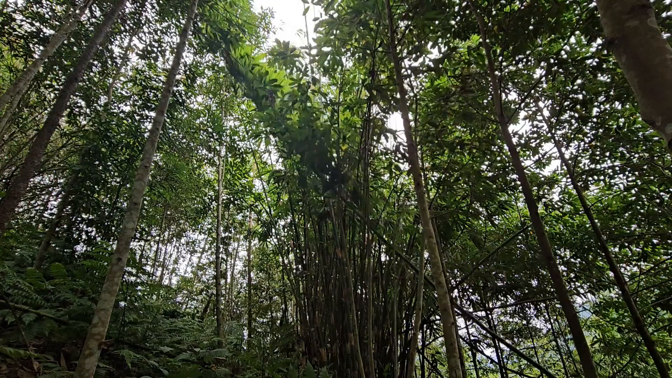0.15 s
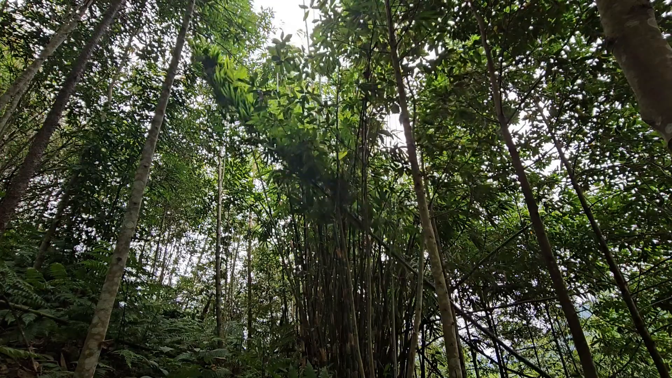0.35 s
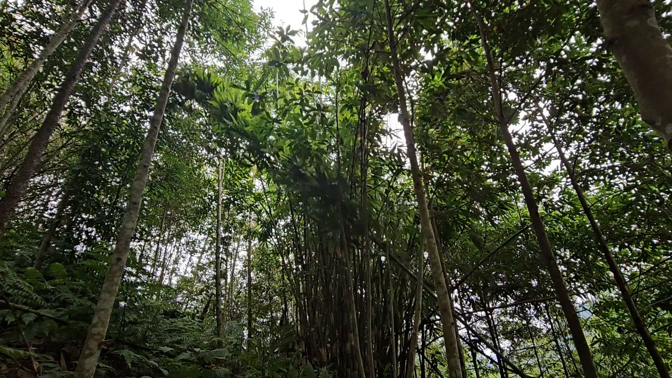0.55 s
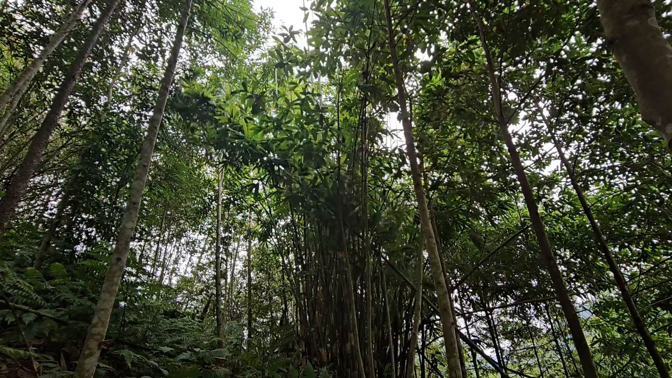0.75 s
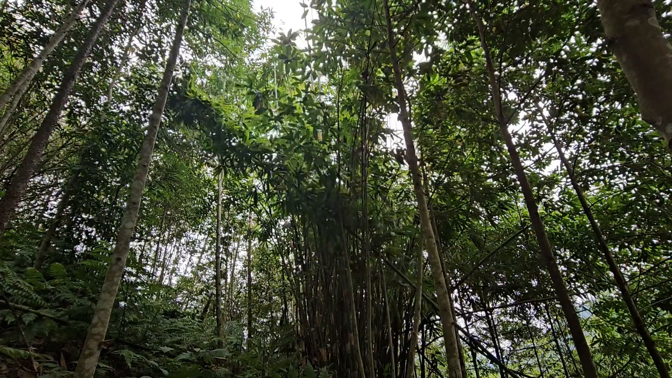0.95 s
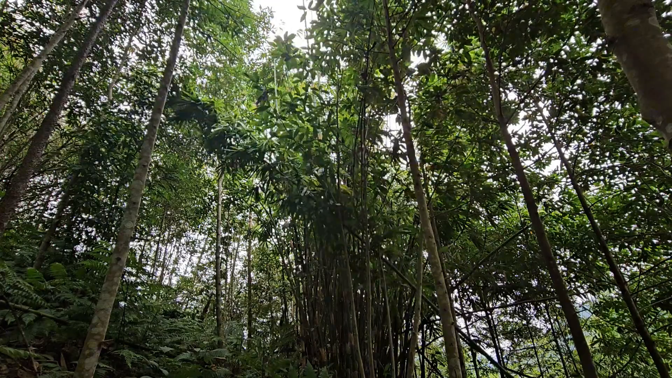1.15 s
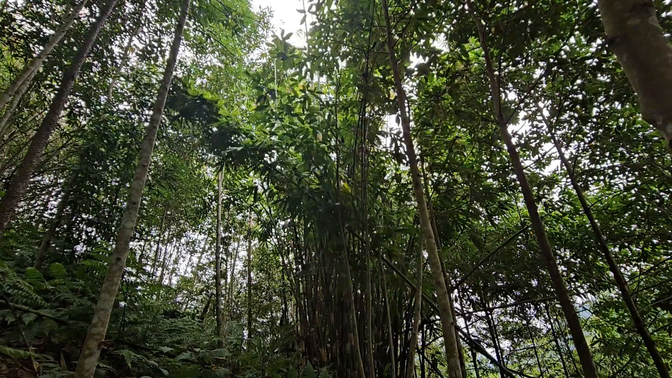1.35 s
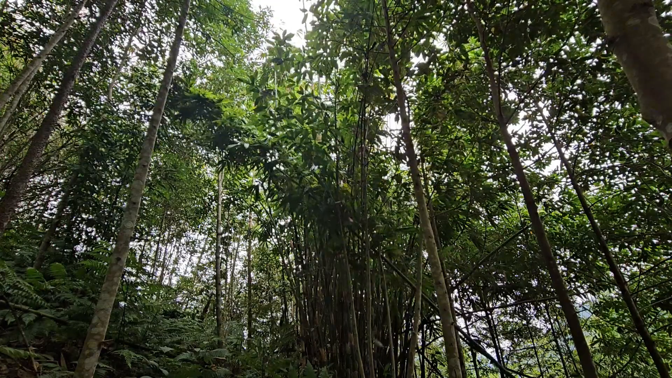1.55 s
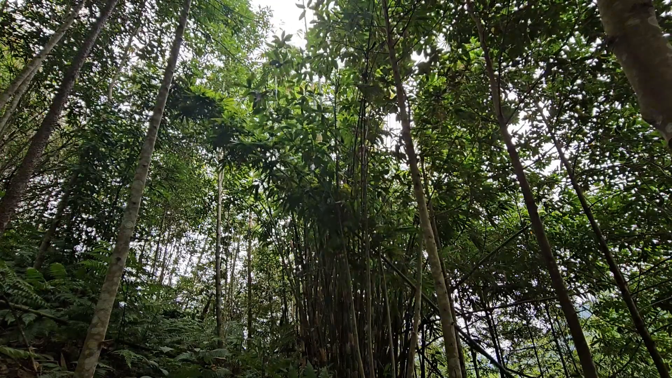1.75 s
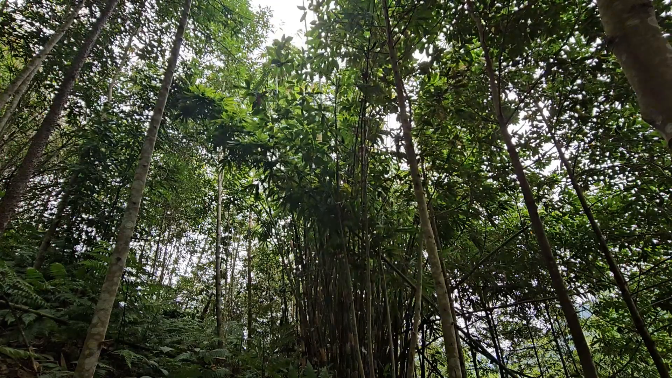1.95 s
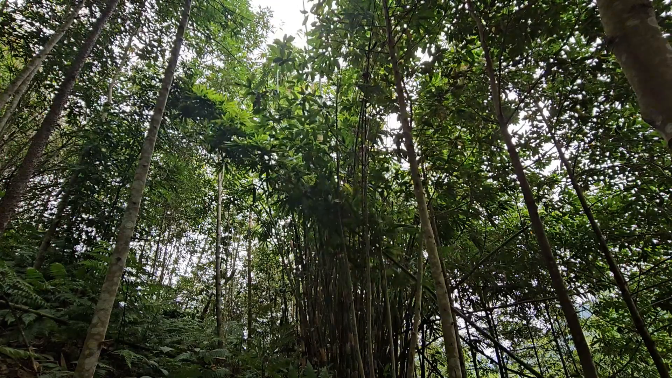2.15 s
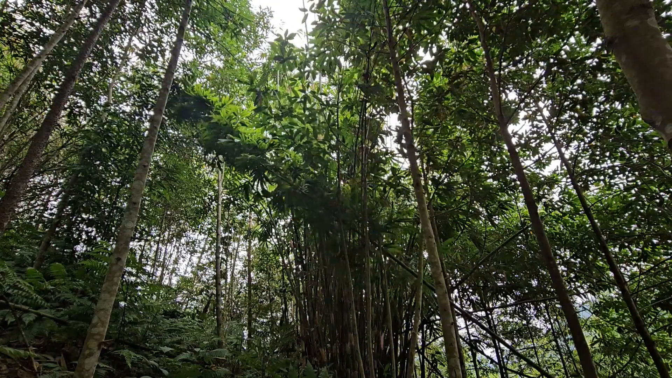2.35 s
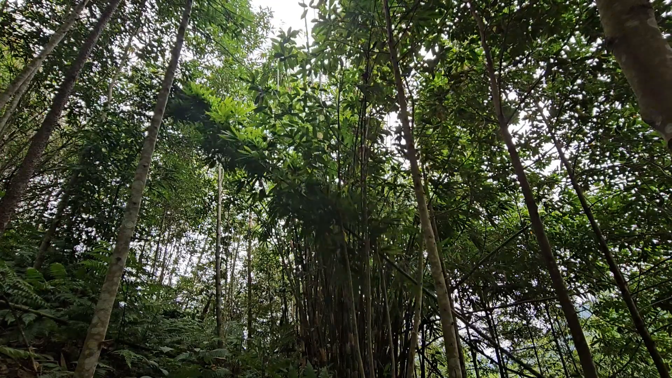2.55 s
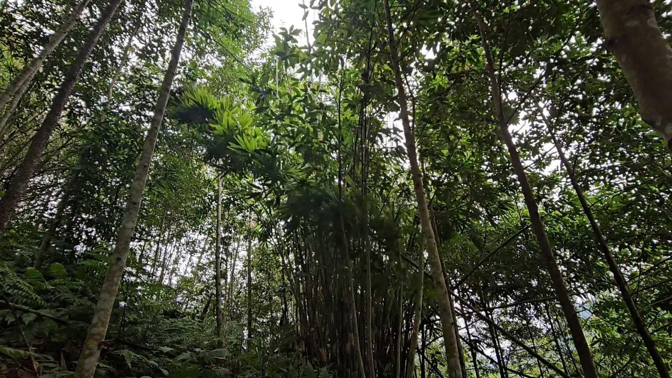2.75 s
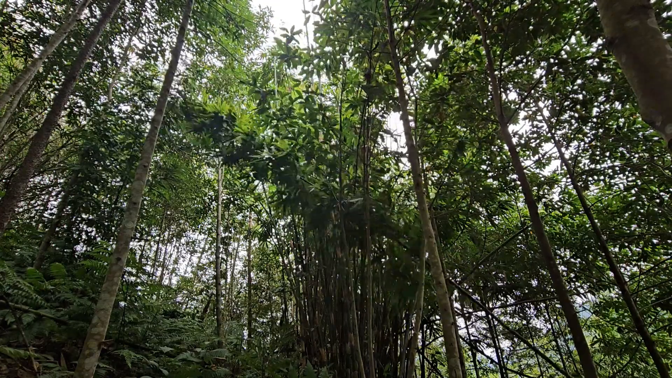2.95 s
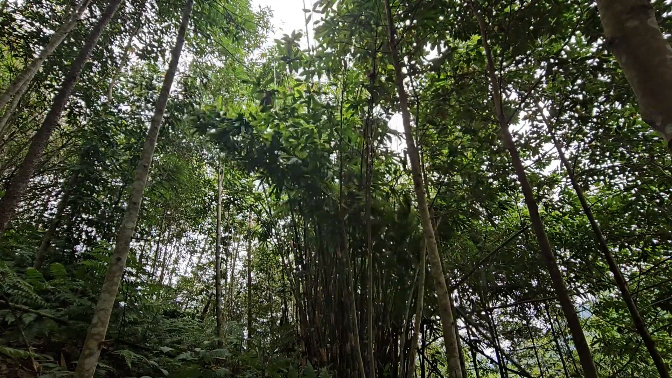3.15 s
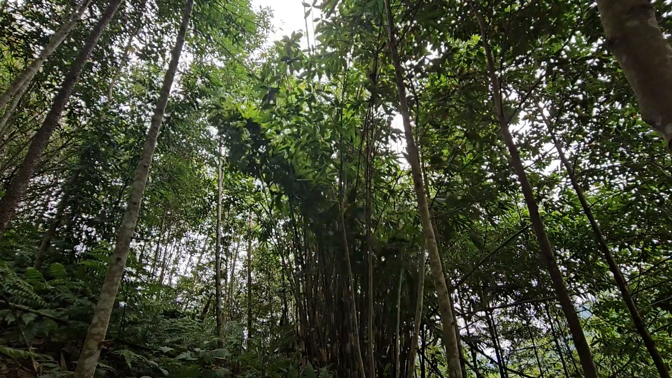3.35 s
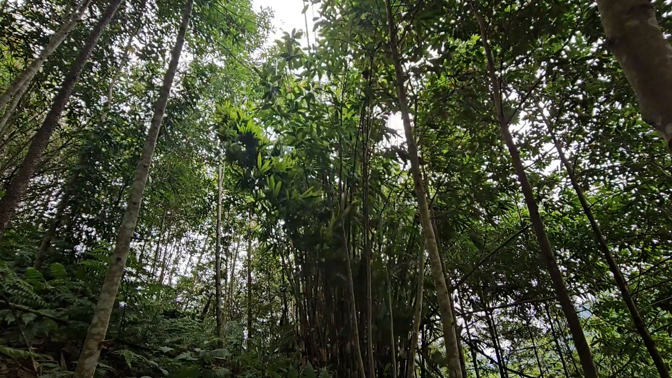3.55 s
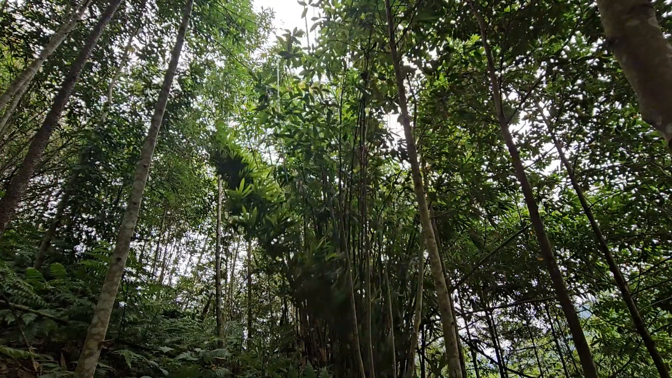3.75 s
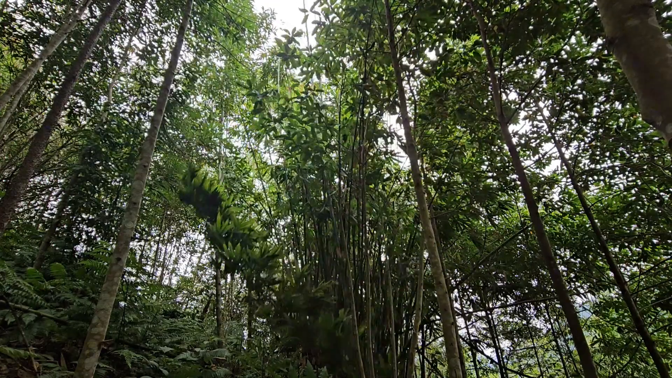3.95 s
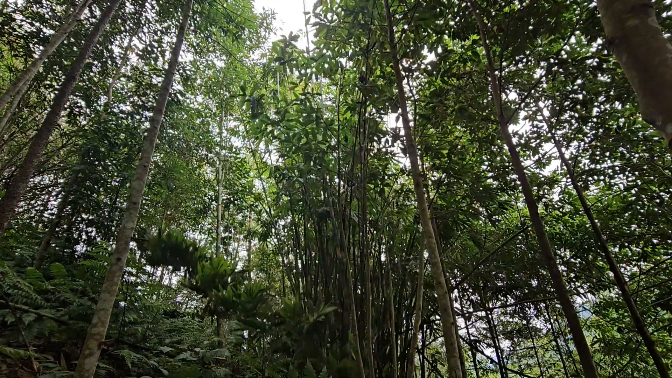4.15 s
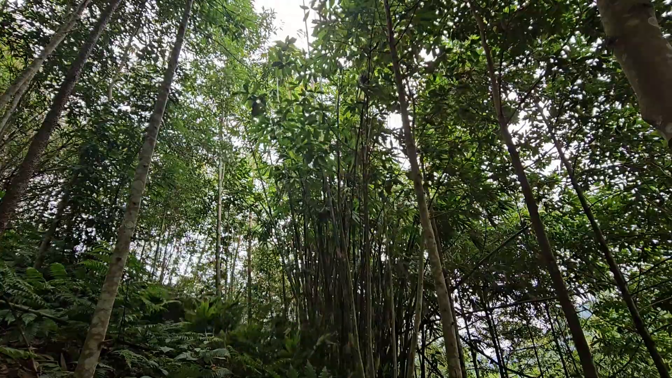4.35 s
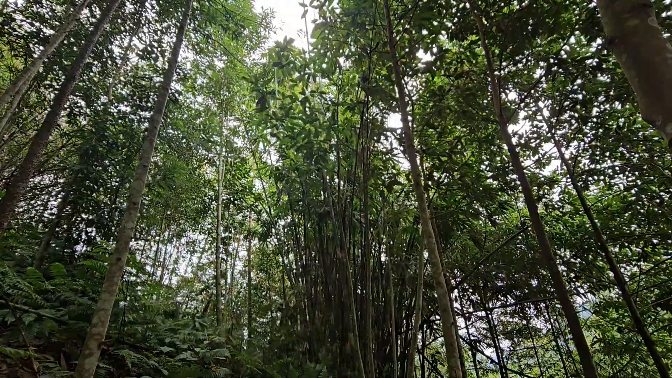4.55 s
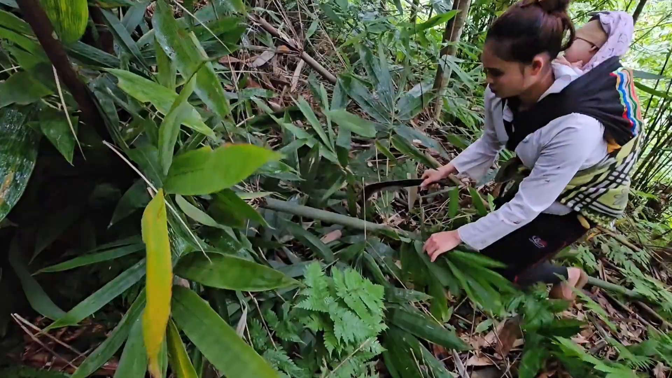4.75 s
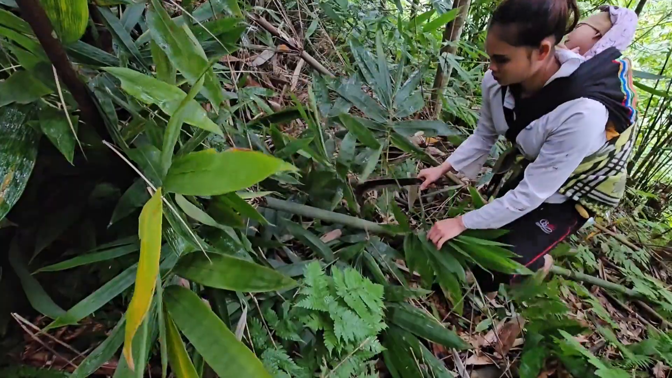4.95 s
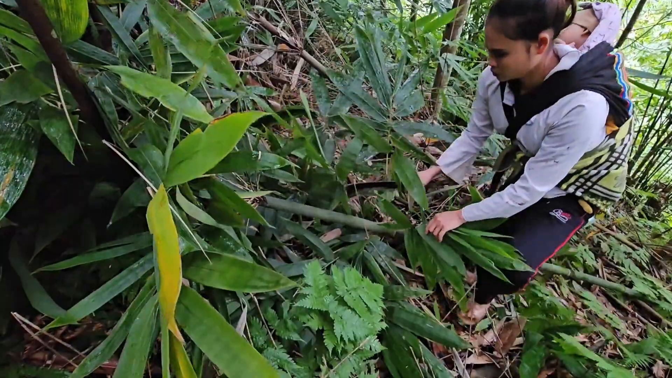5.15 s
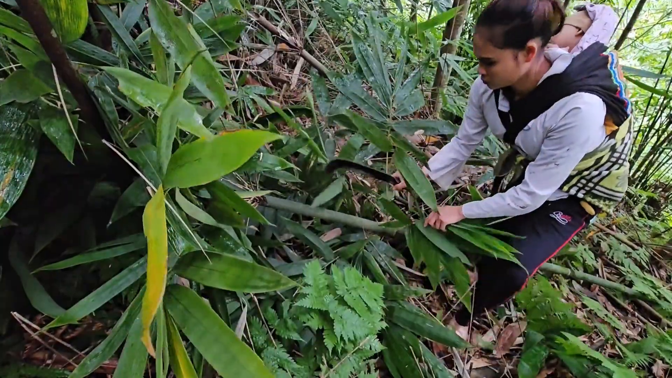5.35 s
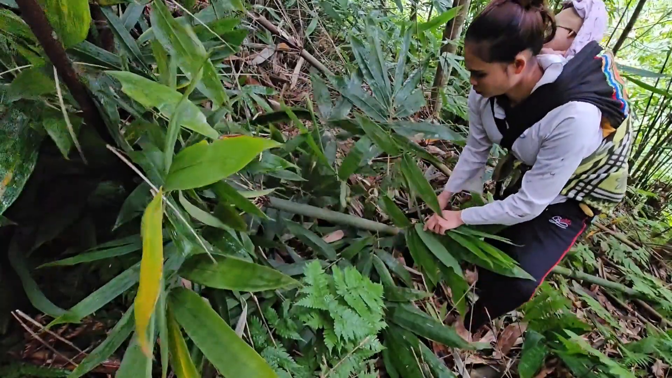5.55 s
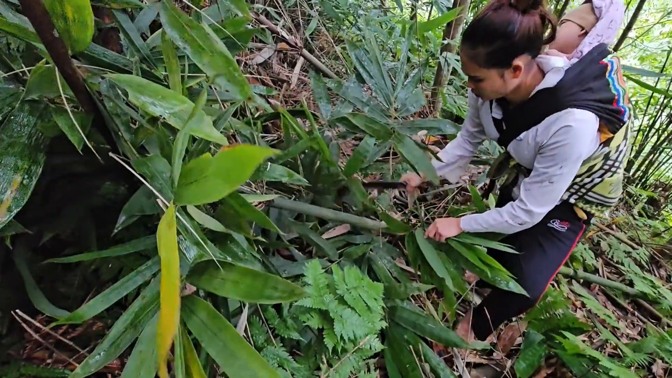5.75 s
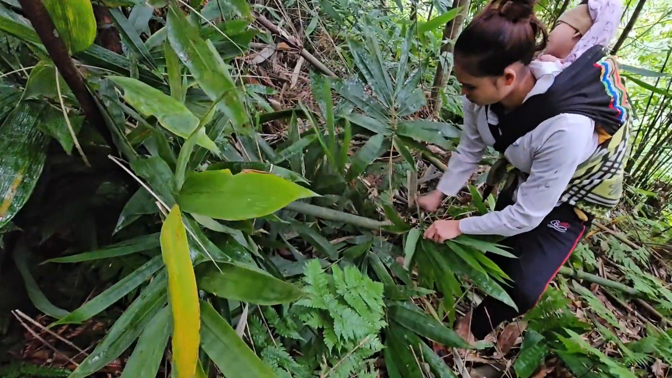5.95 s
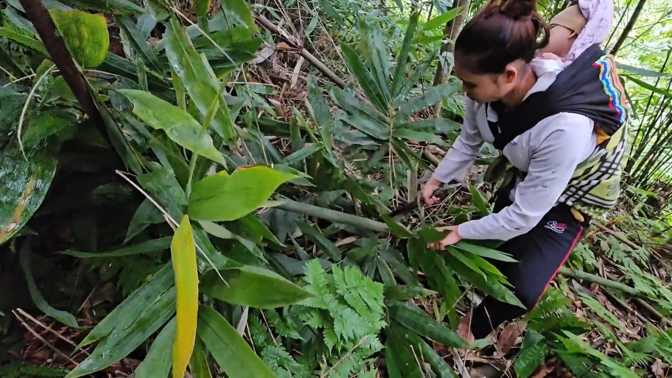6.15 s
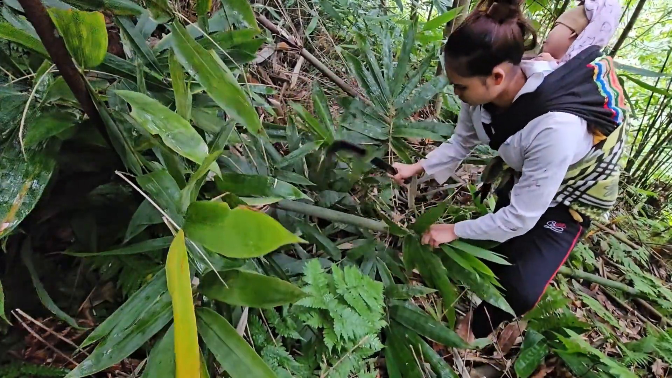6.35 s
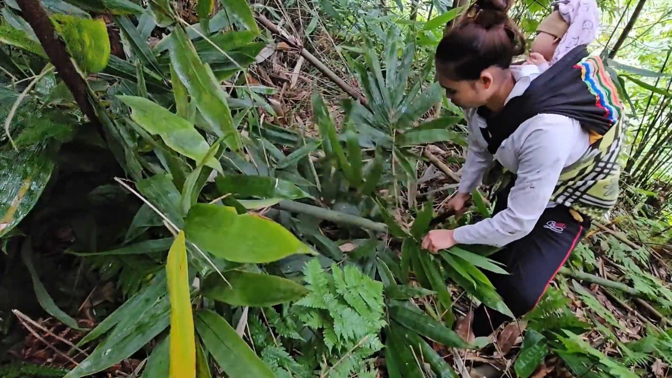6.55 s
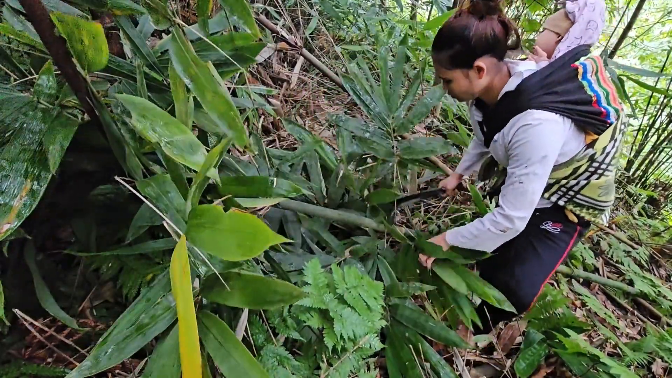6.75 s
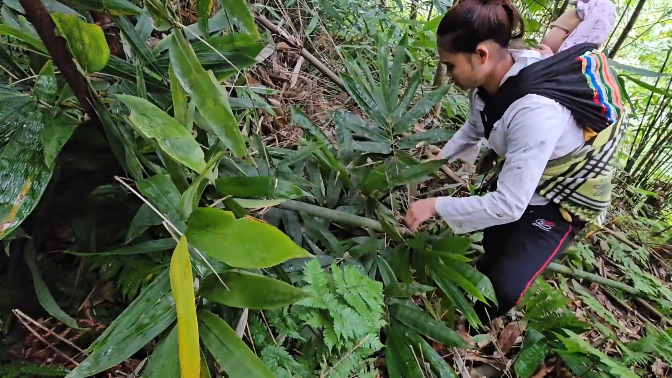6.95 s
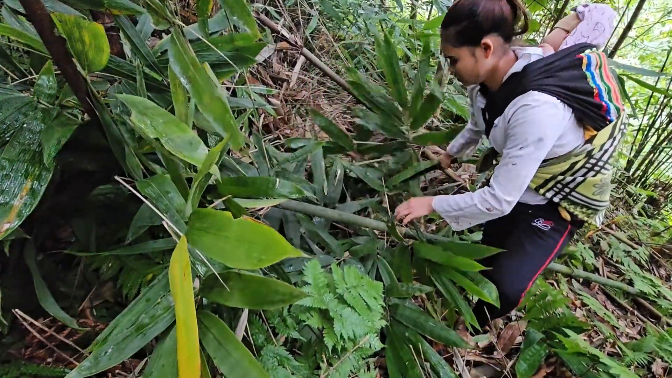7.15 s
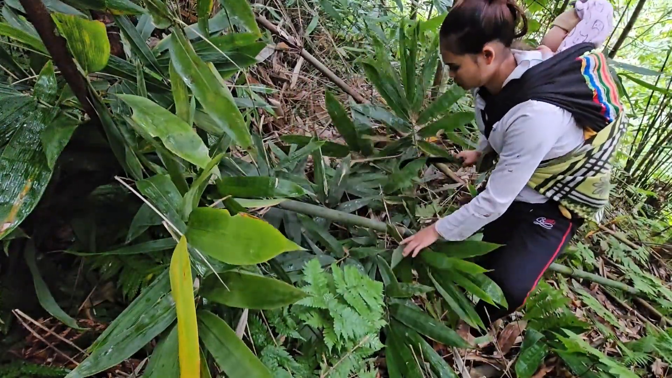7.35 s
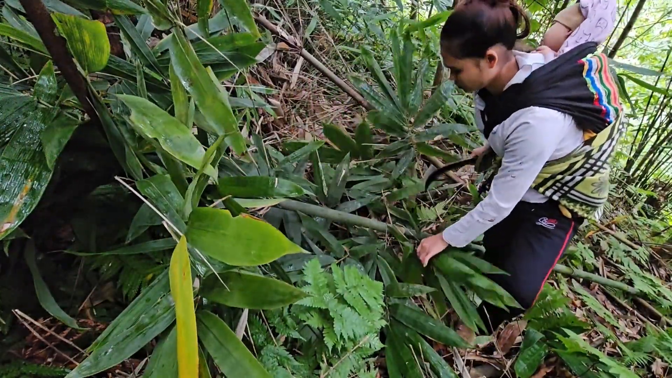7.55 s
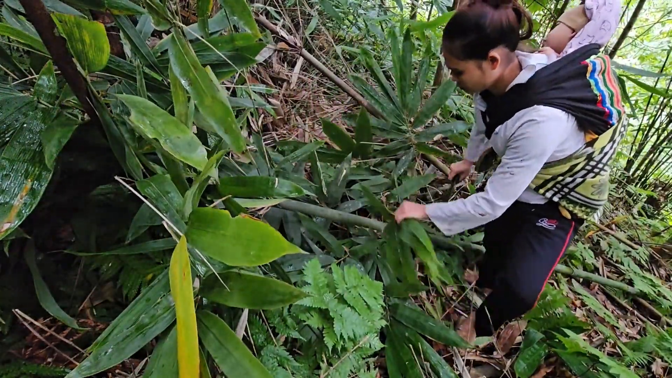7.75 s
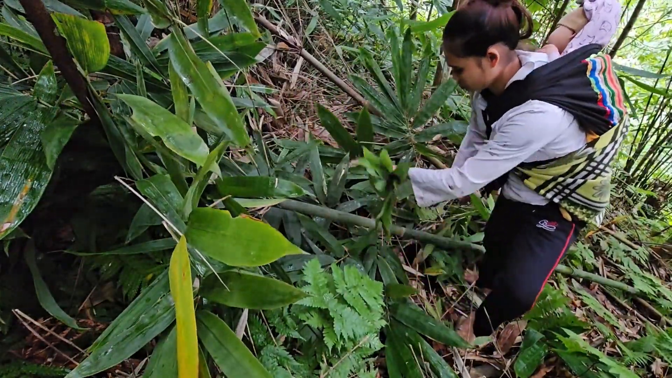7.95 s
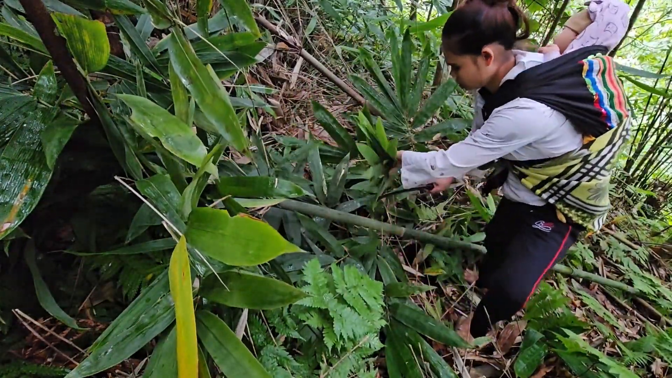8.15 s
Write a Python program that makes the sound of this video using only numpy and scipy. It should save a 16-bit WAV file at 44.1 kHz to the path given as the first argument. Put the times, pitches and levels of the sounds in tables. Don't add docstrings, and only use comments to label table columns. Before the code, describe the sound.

Leaves swish and a bent stem faintly groans as bamboo comes down; then three sharp, hollow woody chops nearby, leaves shaking and fibres crackling.

```python
import sys
import numpy as np
from scipy import signal
from scipy.fft import rfft, irfft
from scipy.io import wavfile

SR = 44100
rng = np.random.default_rng(int(sys.argv[2]) if len(sys.argv) > 2 else 0)


def amplitude_ratio(level_db):
    exponent = np.asarray(level_db, float) / 20
    return 10 ** exponent


def master(y):
    cut = np.clip(np.atleast_2d(y).T, -1, 1)
    pcm = np.round(cut * 32767)
    wavfile.write(sys.argv[1], SR, pcm.astype(np.int16))


N = 362061

# [t/s, level/dB]
CROWN = [(0.0, -44), (.36, -44), (.66, -39.5), (.8, -43.5), (.92, -47), (1.17, -52), (1.58, -57.5),
         (1.78, -59), (1.97, -57), (2.1, -53), (2.75, -45.5), (3.02, -44.5), (3.16, -42.5), (3.52, -41),
         (3.86, -45), (4.08, -46), (4.42, -41.5), (4.68, -47)]
# [t/s, level/dB]
FOLIAGE = [(4.68, -50), (4.83, -48.5), (4.96, -54.5), (5.17, -53.5), (5.32, -49), (5.39, -56), (6.9, -53),
           (7.0, -45.5), (7.19, -44), (7.32, -41.5), (7.42, -47.5), (7.53, -49.5), (7.57, -53.5),
           (7.78, -51.5), (7.95, -56.5), (8.1, -63), (8.15, -58.5), (8.21, -59)]
# [f/Hz, level/dB per Hz]
CROWN_COLOUR = [(18, -51), (30, -20), (67, -11), (163, -10), (242, -10), (397, -9.5), (572, 1.5),
                (618, -3.5), (1040, -1.5), (2460, -2), (4370, 2), (9820, -4.5), (11500, -5.5), (15300, -6)]
FOLIAGE_COLOUR = [(18, -48), (30, -17.5), (126, -4), (186, -8), (236, -7), (358, -12), (543, -0.5),
                  (891, -8.5), (1500, -2), (2600, -3), (6470, -1.5), (9820, -8), (11500, -3), (15300, -6)]
# [f/Hz, left-right correlation/1]
CROWN_LIKENESS = [(60, 0.91), (180, 0.63), (550, 0.062), (1650, 0.0067), (4970, 0.0071), (15000, 0.011)]
FOLIAGE_LIKENESS = [(60, 0.83), (180, 0.9), (550, 0.81), (1650, 0.26), (4970, 0.062), (15000, -0.13)]
# [f/Hz, left-right level/dB]
CROWN_BALANCE = [(60, 0.5), (240, 0.5), (950, 1.5), (3770, 1.0), (15000, 2.5)]
FOLIAGE_BALANCE = [(60, -0.5), (240, 1.5), (950, 0.5), (3770, -1.5), (15000, 2.5)]
# [level/dB at middling motion, slope/dB per dB of motion]
CROWN_LAYERS = [(-78, 0.58), (-57.5, 0.71), (-46, 0.99), (-47, 1.2)]
FOLIAGE_LAYERS = [(-69.5, 0.68), (-56.5, 0.86), (-45, 0.94), (-46.5, 1.01)]
MIDDLING_DB = -46
# [t/s, rise time/s, leaf hiss level/dB]
WHIPS = [
    (5.5, 0.11, -40.5),
    (5.97, .11, -41),
    (6.51, 0.11, -44),
    (7.035, 0.049, -35),
]
WHIP_SHARPNESS = 1.2
# [f/Hz, t60/s, level/dB]
SHAKE = [(30, .3, -28), (62, 0.4, -11), (100, 0.35, -6), (155, 0.44, -12.5), (257, 0.38, 3), (500, 0.21, 3),
         (942, 0.21, -5), (3000, 0.38, 0), (11800, 0.37, -3)]

# [t/s, level/dB]
GROAN = [(0.0, -65), (0.06, -57), (0.44, -63.5), (0.49, -53), (1.24, -79), (1.47, -66), (1.58, -78),
         (3.06, -60), (3.09, -56.5), (3.92, -62.5), (3.95, -79), (4.48, -61), (4.51, -52), (4.68, -83)]
GROAN_HZ, GROAN_OCTAVES, GROAN_FLICKER_DB = 245, 0.56, 2.5

# [t/s, length/s, level/dB, f/Hz]
PUSHES = [(0, 0.036, -65, 80), (1.811, 0.052, -55.5, 330), (1.9, 0.065, -70, 110), (3.1, 0.1, -52.5, 252),
          (4.12, 0.09, -65, 110), (4.4, .1, -57, 90), (6.506, 0.025, -34, 620), (7.049, 0.17, -54, 200)]
SWING_LEAD_S, SWING_S, SWING_DB, SWING_HZ = 0.045, 0.064, -45, 200
PUSH_OCTAVES = 2
# [t/s, length/s, level/dB, f/Hz]
BUMPS = [(0.057, 0.13, -55, 470), (0.479, .059, -61, 120), (.747, .055, -62, 80), (1.443, 0.04, -68, 150),
         (2.41, .049, -56.5, 100), (3.2, .06, -71, 70), (3.417, .043, -58, 60), (3.792, 0.076, -58, 60),
         (4.256, 0.091, -56, 110), (4.509, 0.047, -41.5, 400), (4.59, 0.056, -51.5, 129),
         (4.891, 0.027, -59, 230), (5.442, 0.063, -38, 500), (5.923, 0.036, -40, 600),
         (7.04, 0.077, -46, 150), (7.365, .038, -56, 70.4)]
BUMP_OCTAVES, BUMP_PAN_DB, BRUSH_PAN_DB = 1.86, -0.3, 0.4
# [t/s, length/s, level/dB, f/Hz, width/octaves]
BRUSHES = [(.125, 0.053, -47.5, 600, 2.1), (0.478, 0.066, -39, 905.4, 6.3), (1.806, 0.075, -49, 1600, 0.5),
           (1.818, 0.07, -49.5, 3400, 0.45), (1.925, 0.03, -46, 1250, .9), (1.927, 0.02, -51, 2480, 0.26),
           (2.353, 0.098, -47, 1060, 2.3), (2.394, 0.038, -38.5, 3800, 0.55),
           (3.094, 0.094, -37.5, 1500, 5.1), (3.119, 0.022, -31, 11500, 1.0),
           (3.631, 0.037, -34, 5000, 8.6), (5.212, 0.077, -39.5, 8040, 1.9),
           (5.443, 0.052, -28.5, 4960, 5.6), (5.721, 0.051, -37, 1200, 6.6),
           (5.896, 0.028, -34.5, 1800, 5.8), (5.925, .02, -25, 4770, 2), (5.945, 0.023, -20.5, 5000, 3.6),
           (6.247, 0.087, -38, 2000, 5), (6.458, 0.052, -27.5, 5360, 8.9), (6.99, 0.089, -35, 4000, 3.3),
           (7.287, .02, -42, 2580, 2), (7.745, 0.058, -46, 5500, 1.5)]
# [t/s, length/s, level/dB,
# f/Hz, width/octaves]
SURGES = [
    (.478, .06, -49, 5000, 2.6),
    (0.736, 0.16, -43, 4500, 2.2),
    (2.022, 0.12, -59, 5350, .25),
    (3.165, 0.13, -41, 1500, 5.4),
    (5.008, .1, -63, 1300, 2.1),
    (6.169, 0.062, -43, 3000, 2.6),
    (6.503, 0.13, -34.5, 3000, 2.7),
    (7.04, 0.18, -36, 6030, 2),
]
# [t/s, length/s, level/dB, f/Hz, width/octaves]
GRAZES = [(3.8, 0.057, -52, 640, 0.49), (4.069, 0.06, -49.5, 1500, 2.4), (4.27, .03, -47, 1200, 2.7),
          (4.406, 0.027, -45, 1000, 2.5), (5.14, .015, -56, 4000, 3.1), (5.065, .02, -57, 4000, 4.1),
          (5.2, 0.065, -45, 7000, .6), (5.309, 0.032, -42, 12000, 1.6), (5.463, .014, -22, 7000, 3.1),
          (5.5, 0.022, -37, 3000, 2.5), (6.472, .015, -32, 4700, 1.1), (7.313, 0.015, -37, 2500, 2.1),
          (7.08, .06, -38, 6000, 2.5), (3.14, .1, -41, 9000, 1.5), (5.456, 0.011, -29, 5000, 3.1),
          (.04, 0.13, -54, 465, 0.28), (6.462, .015, -37, 600, 1.9), (5.719, 0.01, -33.5, 5300, 2.1),
          (7.06, 0.093, -49, 420, 1.5), (5.25, 0.025, -51, 3000, 1.5), (7.97, .04, -48, 9400, 1.2),
          (4.59, .06, -56, 73, 1.1), (.13, .06, -65, 60, 1.1)]
# [t/s, length/s,
# level/dB, f/Hz, width/octaves]
HANDLING = [(5.495, 0.032, -31, 200, .7), (5.962, .035, -34, 265, 0.66), (6.51, 0.028, -38, 217, 0.55),
            (6.492, .012, -28, 3000, .6), (7.448, .018, -47, 4000, 2.5), (7.5, 0.043, -46, 4300, 2.6),
            (7.603, .012, -45, 8000, 2.6), (7.835, .012, -51, 6000, 3.1), (8.148, .015, -49, 7000, 2.6),
            (7.208, .01, -42, 910, 1.4), (6.586, .006, -41, 4500, 1.1), (5.415, 0.035, -45, 2300, 1.7),
            (1.96, 0.036, -57, 830, 1.2), (1.45, 0.072, -61.5, 700, 1.1), (3.5, 0.085, -55.5, 550, .6),
            (7.37, .05, -56, 200, .9)]

# [t/s, peak level/dB, f/Hz, width/octaves, left-right level/dB]
SNAPS = [(1.7015, -35, 4300, 1.4, 1.5), (1.722, -40, 3830, 1.3, 1), (1.831, -35, 3460, 0.9, -5),
         (3.1175, -16, 11500, .9, 2), (3.6318, -18, 10000, 0.9, -0.5), (5.31, -26, 7950, 2.5, -7),
         (5.421, -29, 3640, 2.9, 1), (5.46, -14.5, 2800, 1.2, 1), (5.467, -2.5, 8960, 2, -2),
         (5.829, -30, 4825, 0.8, .5), (6.416, -45, 2050, 1.3, -8), (7.209, -33, 1380, 1.6, -5),
         (7.276, -32, 11400, .5, -10), (7.297, -27, 2550, 1.2, -1), (7.452, -34, 3780, 1.2, 2),
         (7.608, -34, 5460, 1.7, -9), (7.709, -35, 1190, 0.85, -2), (7.836, -46, 625, 0.93, 4),
         (7.892, -35, 8000, 1.8, -5), (7.908, -33, 2800, 1.5, 3), (7.989, -33, 6500, 2.5, 0),
         (8.126, -49, 524, 0.54, 2), (8.148, -31, 4860, 1.7, 0)]
# [t/s, peak level/dB, f/Hz, width/octaves, left-right level/dB]
CRACKS = [(1.7895, -41, 1500, 3.3, -4), (2.195, -31, 1500, 5.2, 11), (2.394, -21.5, 1560, 2.15, -3),
          (4.831, -43, 750, 1.2, 0), (5.236, -28, 2500, 3.3, -3), (5.718, -20, 3970, 2.1, 2.5),
          (5.927, -19, 4500, 1.4, 2), (5.953, -5, 5000, 4.2, 0), (6.449, -23, 4000, 1.8, 1),
          (6.462, -19, 4500, 4.5, -11), (6.589, -34, 3500, 1.6, 1), (6.602, -31, 1300, 1.8, 2),
          (7.034, -25.5, 700, 3.2, 0), (7.083, -17, 2500, 2.9, -2), (7.211, -28, 700, 3.4, -1),
          (7.3735, -22, 2000, 1.3, 1)]
# [t/s, peak level/dB, f/Hz, width/octaves, left-right level/dB]
SPLINTERS = [(5.929, -16, 3300, 2.2, 0.1), (5.953, -7, 7000, 1.9, 2), (5.9572, -9, 2900, .9, .1),
             (5.9598, -11, 3300, 1.5, 3), (5.9645, -17, 1300, 1.5, 2), (6.4962, -6.5, 1430, 1.7, -1),
             (5.4975, -10, 1200, 2.6, .1), (7.1, -28, 4500, 1.3, .1), (7.375, -28, 9000, 1.1, .1),
             (7.033, -23, 3500, 1.3, -2), (1.7015, -34.5, 4000, 1.1, .1), (1.7895, -35, 5500, .9, .1),
             (5.491, -17, 2000, 3.1, .1), (5.736, -27, 2200, 1.8, .1), (5.692, -31, 1400, 1.3, .1),
             (5.558, -24, 4000, 2.6, .1), (7.211, -28.5, 1040, 1.4, .1), (3.2, -21, 11000, 1.2, .1),
             (6.604, -26, 2000, 0.27, .1), (1.722, -39, 1800, 1.8, .1)]
# [t/s, peak level/dB, f/Hz, width/octaves, left-right level/dB]
TICKS = [
    (3.117, -8, 11000, 1.1, 2),
    (3.6312, -11.5, 9300, .55, 0),
    (7.8905, -27, 8000, 1.6, -3),
    (7.9885, -25, 8000, 1.8, 0),
    (1.7895, -35, 6000, 1.3, 0),
    (7.9, -38, 6500, .6, 0),
    (8.112, -41, 5000, 1.2, 0),
]
SNAP_T60_S, CRACK_T60_S, SPLINTER_T60_S, TICK_T60_S = 0.027, 0.036, 0.011, 0.008
SNAP_CLICK, SPLINTER_CLICK, TICK_CLICK = 6, 11, 14

KNOCK_S, KNOCK_DB = 4.506, -18
# [f/Hz, level/dB, t60/s]
STANDING_STEM = [(262, -30, 0.077), (910, -0.5, 0.028), (1010, -18, 0.093), (1300, -6, 0.011),
                 (1560, 3, 0.023), (1660, -22, 0.04)]
# [t/s, peak level/dB]
REBOUNDS = [
    [(5.503, -15), (5.512, -20), (5.524, -24), (5.575, -32)],
    [(5.972, -25), (5.986, -17.5), (6.004, -27)],
    [(6.505, -19), (6.516, -22), (6.528, -26)],
]
REBOUND_CUT_HZ = 1160
# [t/s, peak level/dB, f/Hz, t60/s]
THUMPS = [(5.4945, -18, 245, .05), (5.4955, -26, 560, .04), (5.499, -19, 980, .05), (5.508, -24, 600, .05),
          (5.516, -27, 165, .08), (5.9625, -17, 260, .045), (5.9636, -1, 480, .005), (5.971, -21, 660, .05),
          (5.983, -22, 540, .06), (6.003, -28, 540, .05), (6.492, -27, 200, .04), (6.493, -17, 2750, .025),
          (5.962, -24, 1300, .02), (6.493, -21, 730, .03), (6.506, -25, 550, .07), (6.518, -31, 220, .07),
          (6.602, -33, 2070, .03), (5.9, -38, 560, .04), (5.9, -38, 200, .04), (6.462, -32, 480, .03),
          (7.209, -34, 900, .025)]
THUMP_CONTACT_S = 0.0004

# [t/s, peak level/dB, stem ring level/dB, shaken leaves level/dB, shaken stem level over leaves/dB]
BLOWS = [
    [(5.493, -1.5, -6.5, -21.5, -2.5)],
    [(5.955, -9.5, -25, -16, -5.5), (5.961, -13, -13, -15.5, -2)],
    [(6.492, -3, -15.5, -23.5, -3)],
]
# [f/Hz, level/dB per Hz]
SPLIT_AT_CUT = [
    [(180, -30), (270, -2), (717, -7), (1120, -6), (1630, -1), (2810, -12), (6290, -2.5), (8460, -9.5),
     (15300, -24)],
    [(180, -29), (300, -3), (949, -13), (1890, 0), (2460, -7), (4310, 0), (9190, -12), (11200, -5),
     (15300, -13)],
    [(180, -39), (300, -16), (1190, -3), (1690, -7.5), (2060, 2), (2420, -8), (4170, -6.5), (9650, -9.5),
     (15300, -35)],
]
# [f/Hz, level/dB, t60/s]
STEM_AT_CUT = [
    [(105, -8, 0.083), (255, 0.5, 0.043), (554, 3, 0.065), (726, -3, 0.11), (962, 3, 0.057),
     (1450, -14, 0.17), (1590, 4, 0.045), (1640, -8, 0.21), (1810, -1, 0.1), (2050, -15, 0.13),
     (2210, -22, 0.061)],
    [(275, -4.5, 0.18), (542, 1, 0.51), (680, 4, 0.032), (904, -46, 0.12), (1620, 0, 0.12),
     (2000, -7, 0.43), (2060, 1, 0.086), (2440, -11, 0.54), (2730, -14, 0.18), (2700, 0, 0.15),
     (3170, -40, 5.0)],
    [(228, -6, .3), (545, -1, 0.25), (730, -4, 0.33), (960, -2, 0.15), (1020, -6, 0.16), (1240, -5, 0.05),
     (1500, -1, 0.22), (1670, -17, 0.38), (1894, -13, 0.024), (1940, -6, 0.59), (2509, -24.5, 0.63)],
]
GREEN_WOOD_T60_S = 0.075
SPLIT_S, SPLIT_FOLLOWS = 0.00849, 0.73

# [f/Hz, width/Hz, added share/1]
MICROPHONE_PEAK = (11480, 250, 0.99)
TOP_HZ = 16900


def rms_one(x):
    return x / np.sqrt(np.mean(x ** 2) + 1e-20)


def at_hz(points, hz):
    table_hz, values = np.array(points)[:, 0], np.array(points)[:, 1]
    return np.interp(np.log(hz), np.log(np.maximum(table_hz, 1)), values)


def drift(rate, size):
    r = np.exp(-32 * np.pi * rate / SR)
    coarse = rng.standard_normal(size // 16 + 3002)
    slow = signal.lfilter([1], [1, -2 * r, r * r], coarse)[3000:]
    return np.interp(np.arange(size) / 16, np.arange(len(slow)), rms_one(slow - slow.mean()))


def dying(t60, size):
    return amplitude_ratio(-60 * np.arange(size) / SR / max(t60, 0.001))


def band(x, low_hz, high_hz):
    edges = np.clip([low_hz, high_hz], 15, 0.46 * SR)
    return signal.sosfilt(signal.butter(2, edges, "band", fs=SR, output="sos"), x)


def octaves_round(x, hz, octaves):
    half = 2 ** (max(octaves, 0.2) / 2)
    return band(x, hz / half, hz * half)


def port_noise(hz, size):
    shared = rng.standard_normal(size)
    own = rng.standard_normal((2, size))
    alike = np.clip(900 / hz, 0, 0.97)
    return np.sqrt(alike) * shared + np.sqrt(1 - alike) * own


def panned(x, pan_db):
    return x * amplitude_ratio(np.array([[pan_db / 2], [-pan_db / 2]]))


def add(out, x, s):
    at = round(s * SR)
    out[:, at:at + x.shape[1]] += x[:, :N - at]


def grove(x, level_db, t60):
    size = 9000
    tail = rng.standard_normal((2, size)) * dying(t60, size)
    tail *= np.arange(size) > 150
    tail = signal.lfilter([0.5], [1, -0.45], tail) * amplitude_ratio(level_db)
    return signal.fftconvolve(x.mean(axis=0)[None], tail, axes=1)[:, :N]


def motion(t, rows):
    s, db = np.transpose(rows)
    power = amplitude_ratio(np.interp(t, s, db)) ** 2
    for start, rise_s, whip_db in WHIPS:
        along = np.maximum(t - start, 0) / rise_s
        power += amplitude_ratio(whip_db) ** 2 * (along * np.exp(1 - along)) ** (2 * WHIP_SHARPNESS)
    return 10 * np.log10(power)


def shaking(t, hz):
    power = np.zeros(len(t))
    hz_points, t60s, dbs = np.transpose(SHAKE)
    t60 = np.interp(np.log(hz), np.log(hz_points), t60s)
    colour_db = np.interp(np.log(hz), np.log(hz_points), dbs)
    for s, peak_db, ring_db, leaves_db, stem_db in sum(BLOWS, []):
        since = np.maximum(t - s, 0)
        start_db = peak_db + leaves_db + colour_db + stem_db * (hz < 700)
        power += (1 - np.exp(-since / 0.0023)) * amplitude_ratio(start_db - 60 * since / t60) ** 2
    return power


def leaf_contacts(size, per_s, spread_db, contact_s, smooth):
    strengths = amplitude_ratio(spread_db * np.minimum(rng.exponential(1, size), 3.2))
    touches = (rng.random(size) < per_s / SR) * strengths
    r = np.exp(-1 / (contact_s * SR))
    bursts = rms_one(signal.lfilter([1], [1, -r], touches + 1e-18))
    return np.clip(smooth, 0, 1) + bursts * np.clip(1 - smooth, 0, 1)


def rustle(rows, layers, colour, likeness, balance, contacts, patchy_db, gust_db):
    size = round((rows[-1][0] - rows[0][0]) * SR)
    t = rows[0][0] + np.arange(size) / SR
    white = rng.standard_normal((2, 2, size)) * leaf_contacts(size, *contacts)
    edges = 22 * 2 ** (np.arange(30) / 3)
    centres = np.sqrt(edges[1:] * edges[:-1])
    power = amplitude_ratio(at_hz(colour, np.minimum(centres, 15300))) ** 2 * np.diff(edges)
    layer = np.digitize(centres, [165, 1250, 7000])
    swing_db = motion(t, rows) - MIDDLING_DB
    levels = [amplitude_ratio(db + follows * swing_db) ** 2 for db, follows in layers]
    gust = drift(2.54, size)
    out = 0
    for k, hz in enumerate(centres):
        mid, side = rms_one(band(white[k % 2], edges[k], edges[k + 1]))
        alike = np.clip(at_hz(likeness, hz), -1, 1)
        share = power[k] / power[layer == layer[k]].sum()
        gain = np.sqrt(share * (levels[layer[k]] + shaking(t, hz)))
        gain = gain * amplitude_ratio(gust_db * gust + patchy_db * drift(19, size))
        stereo = np.sqrt(1 + alike) * mid + np.sqrt(1 - alike) * side * [[1], [-1]]
        out = out + panned(gain, at_hz(balance, hz)) * stereo
    return out


def groan():
    size = round(GROAN[-1][0] * SR)
    s, db = np.transpose(GROAN)
    hum = octaves_round(port_noise(GROAN_HZ, size), GROAN_HZ, GROAN_OCTAVES)
    level_db = np.interp(np.arange(size) / SR, s, db) - 1.5
    return rms_one(hum) * amplitude_ratio(level_db + GROAN_FLICKER_DB * drift(9.8, size))


def brush(length_s, level_db, hz, octaves, pan_db):
    size = 8000
    along = np.arange(size) / SR / length_s
    sweep = 1.6 * np.sqrt(along) * np.exp(-2 * along ** 3)
    grains = port_noise(hz, size) * leaf_contacts(size, 2000, 8.6, 0.00084, 0.71)
    return panned(rms_one(octaves_round(grains, hz, octaves)) * sweep * amplitude_ratio(level_db), pan_db)


def add_brushes(out, table, *rest):
    for s, *how in table:
        add(out, brush(*how, *rest), s)


def snap(peak_db, hz, octaves, t60, pan_db, click):
    burst = port_noise(hz, size=6000) * dying(t60, size=6000)
    burst[:, 2] += click
    burst = octaves_round(burst, hz, octaves)
    return panned(burst / np.abs(burst).max() * amplitude_ratio(peak_db), pan_db)


def add_snaps(out, table, t60, click):
    for s, peak_db, hz, octaves, pan_db in table:
        add(out, snap(peak_db, hz, octaves, t60, pan_db, click), s)


def ring(force, modes, spread_db):
    out = np.zeros(len(force))
    for (hz, level_db, t60), luck in zip(modes, rng.normal(0, 1, len(modes))):
        r = dying(min(t60, GREEN_WOOD_T60_S), 2)[1]
        w = 2 * np.pi * hz / SR
        mode = signal.lfilter([0, np.sin(w)], [1, -2 * r * np.cos(w), r * r], force)
        out += amplitude_ratio(level_db + spread_db * luck) * mode
    return out / np.abs(out).max()


def knock():
    force = 0.1 * rng.standard_normal(6000) * dying(0.029, size=6000)
    force[[0, 62]] = 1, -0.7
    return panned(amplitude_ratio(KNOCK_DB) * ring(force, STANDING_STEM, spread_db=0.8), 0.3)


def rebound(peak_db, modes):
    force = np.zeros(6000)
    force[0] = 1
    force = signal.sosfilt(signal.butter(2, REBOUND_CUT_HZ, fs=SR, output="sos"), force)
    left = 0.84 * ring(force, modes, spread_db=4.0)
    right = 0.77 * ring(force, modes, spread_db=2.5)
    return amplitude_ratio(peak_db) * np.array([left, right])


def thump(peak_db, hz, t60):
    t = np.arange(6000) / SR
    onset = 1 - np.exp(-t / THUMP_CONTACT_S)
    tone = np.sin(2 * np.pi * hz * t) * dying(t60, size=6000)
    return amplitude_ratio(peak_db) * onset * tone * np.ones((2, 1))


def blow(peak_db, ring_db, split_s, colour, modes):
    size = 12000
    t = np.arange(size) / SR
    force = (t / split_s) ** 2.07 * np.exp(-t / split_s * 3.4)
    tears = rng.standard_normal((3, size)) * amplitude_ratio(1.46 * rng.exponential(1, size)) * force
    stereo_tears = 1.24 * tears[0] + tears[1:]
    hz = np.arange(1, size // 2 + 2) * SR / size
    crack = irfft(rfft(stereo_tears) * amplitude_ratio(at_hz(colour, hz)), size) * (t < 0.1)
    bite = np.zeros(size)
    bite[round(0.45 * split_s * SR)] = 1
    both = crack / np.abs(crack).max() + amplitude_ratio(ring_db) * ring(bite, modes, spread_db=0.5)
    return both / np.abs(both).max() * amplitude_ratio(min(peak_db, 3))


def scene():
    leaves, hits = np.zeros((2, N)), np.zeros((2, N))
    crown = rustle(CROWN, CROWN_LAYERS, CROWN_COLOUR, CROWN_LIKENESS, CROWN_BALANCE,
                   contacts=(500, 5.3, 0.0057, 0.81), patchy_db=0.73, gust_db=-0.5)
    foliage = rustle(FOLIAGE, FOLIAGE_LAYERS, FOLIAGE_COLOUR, FOLIAGE_LIKENESS, FOLIAGE_BALANCE,
                     contacts=(600, 5.3, 0.002, 0.64), patchy_db=1.44, gust_db=1.22)
    add(leaves, crown, CROWN[0][0])
    add(leaves, foliage, FOLIAGE[0][0])
    add(leaves, groan(), 0)
    swings = [(cut[0][0] - SWING_LEAD_S, SWING_S, SWING_DB, SWING_HZ) for cut in BLOWS]
    add_brushes(leaves, PUSHES + swings, PUSH_OCTAVES, BUMP_PAN_DB)
    add_brushes(leaves, HANDLING, BRUSH_PAN_DB)

    add_brushes(hits, BUMPS, BUMP_OCTAVES, BUMP_PAN_DB)
    add_brushes(hits, BRUSHES, BRUSH_PAN_DB)
    add_brushes(hits, SURGES, BRUSH_PAN_DB)
    add_snaps(hits, SNAPS, SNAP_T60_S, SNAP_CLICK)
    add_snaps(hits, CRACKS, CRACK_T60_S, SNAP_CLICK)
    add(hits, knock(), KNOCK_S)
    for cut, colour, modes in zip(BLOWS, SPLIT_AT_CUT, STEM_AT_CUT):
        for s, peak_db, ring_db, *shake in cut:
            split_s = SPLIT_S * amplitude_ratio(SPLIT_FOLLOWS * min(peak_db, 0))
            add(hits, blow(peak_db, ring_db, split_s, colour, modes), s)
    no_bass = signal.butter(4, 48, "high", fs=SR, output="sos")
    hits = signal.sosfilt(no_bass, hits)
    echoes = grove(hits, level_db=-32.0, t60=0.084)

    add_brushes(hits, GRAZES, BRUSH_PAN_DB)
    add_snaps(hits, SPLINTERS, SPLINTER_T60_S, SPLINTER_CLICK)
    add_snaps(hits, TICKS, TICK_T60_S, TICK_CLICK)
    for knocks, modes in zip(REBOUNDS, STEM_AT_CUT):
        for s, peak_db in knocks:
            add(hits, rebound(peak_db, modes), s)
    for s, *how in THUMPS:
        add(hits, thump(*how), s)
    return leaves + hits + echoes


def roll_off(x):
    return signal.sosfilt(signal.butter(12, 15850, fs=SR, output="sos"), x)


def record(dry):
    hz, width, share = MICROPHONE_PEAK
    r = np.exp(-np.pi * width / SR)
    w = 2 * np.pi * hz / SR
    port = signal.lfilter(np.array([1, 0, -1]) * (1 - r * r) / 2, [1, -2 * r * np.cos(w), r * r], dry)
    limited = np.clip(dry + share * port, -1, 1)
    top_cut = signal.cheby2(16, 60, TOP_HZ, fs=SR, output="sos")
    mix = signal.sosfilt(top_cut, limited)
    return roll_off(mix)


dry = scene()
out = record(dry)
master(out)
```